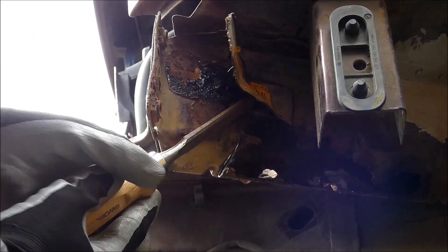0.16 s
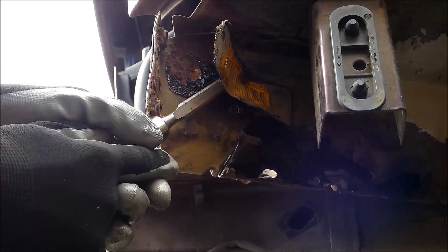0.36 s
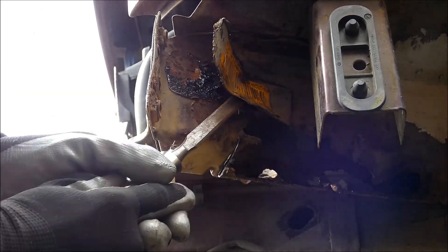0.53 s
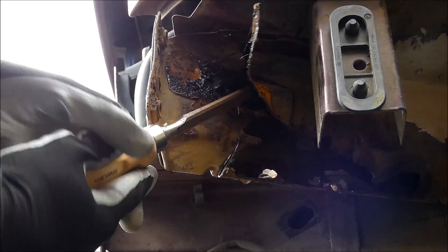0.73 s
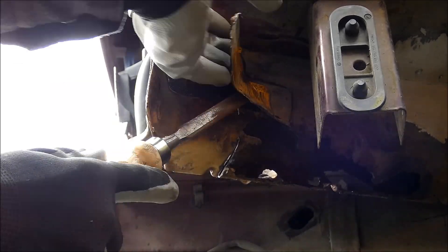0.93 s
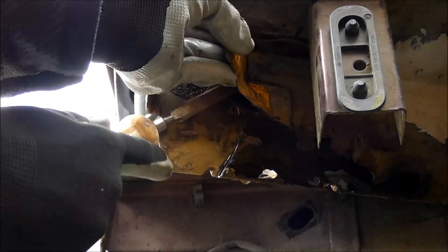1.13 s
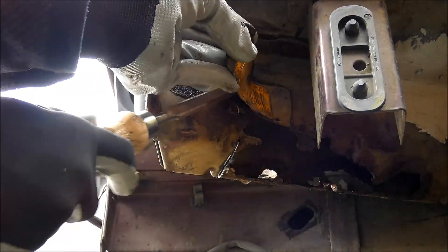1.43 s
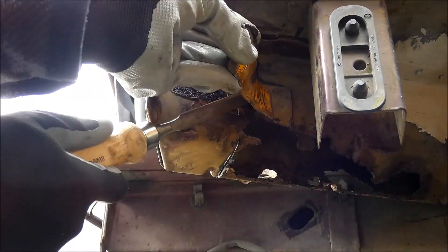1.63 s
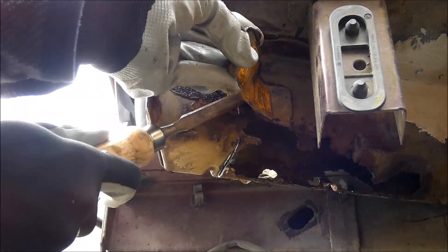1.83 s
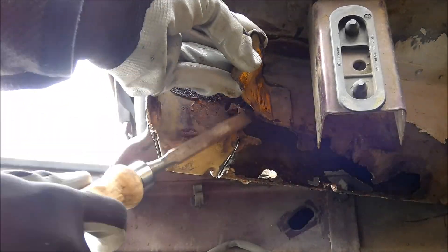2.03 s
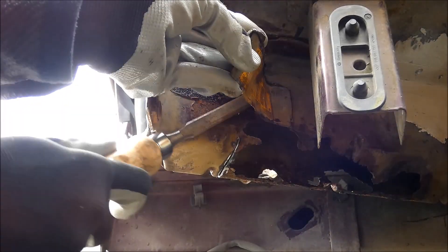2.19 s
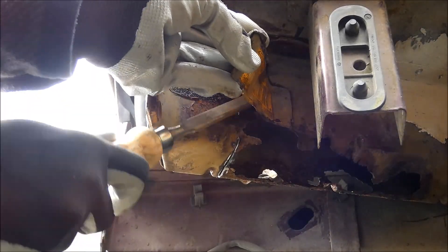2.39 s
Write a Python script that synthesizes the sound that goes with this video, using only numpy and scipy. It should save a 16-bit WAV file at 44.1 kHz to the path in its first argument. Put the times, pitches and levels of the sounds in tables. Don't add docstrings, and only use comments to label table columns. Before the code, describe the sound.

Metal blade prying at rusty car bodywork: bright clinks, gritty crunches and short skids, heard close.

```python
import sys
import numpy as np
from scipy import signal
from scipy.io import wavfile
from scipy.ndimage import uniform_filter1d

SR = 44100
rng = np.random.default_rng(int(sys.argv[2]) if len(sys.argv) > 2 else 0)


def pcm_store(signal):
    levels = np.round(np.clip(np.atleast_2d(signal), -1, 1) * 32767)
    wavfile.write(sys.argv[1], SR, levels.astype(np.int16).T)


def undo_db(level):
    steps = np.asarray(level, float) / 20
    return 10 ** steps


N = 112454

SIDES = np.array([[1], [-1]])
SIDE_SHARE = 0.33
GRIT_PER_S, GRIT_DB = 3000, 3


def unit(x):
    return x / np.sqrt(np.mean(x ** 2))


def band(x, lo_hz, hi_hz):
    return signal.sosfilt(signal.butter(2, [lo_hz, hi_hz], "band", fs=SR, output="sos"), x)


def walk(rate):
    k = int(SR / rate)
    smooth = uniform_filter1d(rng.standard_normal(N), k)
    return unit(uniform_filter1d(smooth, k))


def place(sounds):
    out = np.zeros((2, N + SR))
    for start_s, y in sounds:
        i = int(start_s * SR)
        out[:, i:i + y.shape[1]] += y
    return out[:, :N]


# frequency in Hz, level in dB per Hz.
SHOP_TONE = [(24, -68), (40, -22), (433, 14), (1480, 12.5), (2000, -5), (4800, 1.5), (5180, -41),
             (16000, -29)]
SHOP_DB = -51.5
SHOP_SIDE, BASS_SIDE = 0.35, 0.9
BASS_HZ, BASS_SWAY_DB = 170, 3


def shop():
    out = 0
    tone_hz, tone_db = np.array(SHOP_TONE).T
    sway = BASS_SWAY_DB * walk(4.7)
    for hz in 26 * 2 ** np.arange(0, 9.4, .5):
        mid, side = band(rng.standard_normal((2, N)), hz * .84, hz * 1.19)
        bass = hz < BASS_HZ
        db = np.interp(np.log(hz), np.log(tone_hz), tone_db) + 1.1 * walk(7) + bass * sway
        width = BASS_SIDE if bass else SHOP_SIDE
        out = out + undo_db(db) * (mid + width * side * SIDES)
    return unit(out) * undo_db(SHOP_DB)


# middle in seconds, level in dB.
JOLT_HITS = [(.06, -64), (.35, -64), (.52, -73), (.78, -80), (.93, -75), (1.24, -75), (1.47, -70),
             (1.75, -72), (1.962, -64), (2.128, -65), (2.255, -66), (2.32, -71)]
JOLT_S = 0.0095


def jolts():
    t, out = np.arange(N) / SR, 0
    for s, db in JOLT_HITS:
        u = (t - s) / JOLT_S * 2
        out = out + undo_db(db) * 2 * u * np.exp(-u ** 2)
    return out


# start in seconds, peak in dB, pitch in Hz.
THUD_HITS = [
    (0.438, -43.5, 315),
    (0.823, -56, 300),
    (0.875, -48, 347),
    (.895, -45, 309),
    (0.989, -55, 290),
    (1.612, -51, 353),
    (1.902, -44.5, 356),
    (2.276, -55, 387),
]
THUD_T60_S, THUD_SAG, THUD_RISE_S = 0.089, 0.13, 0.0029


def thuds():
    t, out = np.arange(N) / SR, 0
    for s, db, hz in THUD_HITS:
        u = np.maximum(t - s, 0)
        swell = (1 - np.exp(-u / THUD_RISE_S)) * undo_db(-60 * u / THUD_T60_S)
        sag = 1 - THUD_SAG * np.minimum(u / THUD_T60_S, 1)
        out = out + undo_db(db) * swell * np.sin(2 * np.pi * hz * u * sag)
    return out


ROOM_DB, ROOM_T60_S, ROOM_GAP_S = -20, 0.055, 0.0093
ROOM_LOW_HZ, ROOM_TOP_HZ = 520, 4850


def room(near):
    t = np.arange(int(.3 * SR)) / SR
    tail = band(rng.standard_normal((2, len(t))), ROOM_LOW_HZ, ROOM_TOP_HZ)
    tail = tail * np.exp(-np.log(1000) * t / ROOM_T60_S) * (t > ROOM_GAP_S)
    tail = tail / np.sqrt(np.sum(tail[0] ** 2))
    return undo_db(ROOM_DB) * signal.fftconvolve(near.mean(axis=0)[None], tail)[:, :N]


def grit(chance, per_s, spread_db):
    breaks = chance[0] < per_s / SR
    size = undo_db(-spread_db * np.log(chance[2] + .006))
    return breaks * np.sign(chance[1] - .5) * size


# frequency in Hz, level in dB.
PANEL_MODES = [(945, 3.5), (1240, -11), (1487, 10.5), (1570, 3), (1800, 0), (1990, -4.5), (2220, 8),
               (2370, 7)]
# frequency in Hz, level in dB.
BLADE_MODES = [(2840, 16), (3110, 9), (3380, -22), (3520, 3), (3690, 27), (3890, 0), (4095, 3.5),
               (4200, -12), (4480, -2), (4690, 12), (4770, 19), (4890, -40), (5330, 23)]
# frequency in Hz, level in dB.
FLAKE_MODES = [(5620, -15.5), (6500, -13.5), (6910, 11), (7930, 4.5), (8800, 7.5), (11000, -2)]
# frequency in Hz, level in dB.
HOLLOW_MODES = [(410, -13), (480, 5.5), (530, 9.5), (660, 1.5)]
PANEL, BLADE, FLAKES, HOLLOW = range(4)
# lowest frequency in Hz, highest frequency in Hz.
PART_BANDS_HZ = (933, 2980), (2600, 5030), (4800, 13900), (393, 815)
CRACK_DB, CRACK_T60_S = (-6, 0, -2, -3.5), (0.089, 0.078, 0.088, 0.15)
SNAP_DB = (-3.5, -4.5, -1, -12)
RING_S, RISE_S = .11, .0005
T60_AT_1K_S, T60_SLOPE = .065, .45
GRIP_T60_S, FREE_DB = .008, -17
SCATTER_DB, DETUNE = 2.5, 0.0076
REACH_OCT = .42


def ring(part, centre_hz=None):
    t = np.arange(int(RING_S * SR)) / SR
    lo_hz, hi_hz = PART_BANDS_HZ[part]
    modes = (PANEL_MODES, BLADE_MODES, FLAKE_MODES, HOLLOW_MODES)[part]
    hz, db = np.array(modes).T[:, :, None]

    def fade(t60):
        return np.exp(-np.log(1000) * t / t60)

    strength, shift, side_re, side_im = rng.standard_normal((4, len(hz), 1))
    crack = rng.standard_normal((2, len(t))) * fade(CRACK_T60_S[part])
    if centre_hz:
        db = db - 6 * (np.log2(hz / centre_hz) / REACH_OCT) ** 2
        focus = band(crack, centre_hz * 2 ** -REACH_OCT, centre_hz * 2 ** REACH_OCT)
        crack = focus + 0.59 * crack
    crack = band(crack, lo_hz, hi_hz)

    t60 = T60_AT_1K_S * (hz / 1000) ** -T60_SLOPE
    if part == FLAKES:
        t60 = t60 / 2
    tones = undo_db(db + SCATTER_DB * strength) * fade(t60)
    tones = tones * np.exp(2j * np.pi * hz * (1 + DETUNE * shift) * t)
    mid = tones.imag.sum(axis=0)
    side = (tones * (side_re + 1j * side_im)).imag.sum(axis=0) / np.sqrt(2)

    both = np.array([mid, side]) / np.abs(mid).max()
    both = both + undo_db(CRACK_DB[part]) * crack / np.abs(crack[0]).max()
    if part in (BLADE, FLAKES):
        both = both * (fade(GRIP_T60_S) + undo_db(FREE_DB))
    both = both * (1 - np.exp(-t / RISE_S))
    both[0, int(RISE_S * SR)] += undo_db(SNAP_DB[part]) * SR / 4 / (hi_hz - lo_hz)
    both = band(both, lo_hz * .8, hi_hz * 1.2)
    return both[0] + SIDE_SHARE * both[1] * SIDES


# start in seconds, peak in dB.
KNOCK_HITS = [(.058, -36.5), (.398, -35), (0.514, -31.5), (0.898, -42), (1.113, -32.5), (1.537, -34.5),
              (1.893, -37), (2.1, -41.5), (2.13, -36), (2.17, -49), (2.265, -34), (2.468, -32.5),
              (2.534, -36.5)]
KNOCK_S = .004


def knock(db):
    n = int(KNOCK_S * SR)
    push = np.hanning(n) * rng.standard_normal(n)
    y = signal.fftconvolve(ring(HOLLOW), push[None])
    return undo_db(db) * y / np.abs(y.mean(axis=0)).max()


def knocks():
    return place([(s, knock(db)) for s, db in KNOCK_HITS])


# time in seconds, level in dB.
DRAG_PRESSURE = [(0, -37), (.21, -41.5), (.26, -43.5), (.46, -43.5), (.56, -47.5), (.72, -47.5), (1.0, -50),
                 (1.2, -49), (1.32, -47.5), (1.68, -49), (1.83, -44.5), (2.0, -39.5), (2.07, -60),
                 (2.25, -49), (2.36, -47.5), (2.55, -48.5)]
DRAG_PER_S, DRAG_GRIT_DB = 3500, 3
DRAG_PART_DB = (-6.5, -6, -6, -10.5)
DRAG_FLUTTER_DB, PATCHY_DB = 2.5, 1.5
SPOT_S = .16


def drag():
    s, db = np.array(DRAG_PRESSURE).T
    press = np.interp(np.arange(N) / SR, s, db)
    grains = grit(rng.random((3, N)), DRAG_PER_S, DRAG_GRIT_DB)
    grains = grains * undo_db(press + DRAG_FLUTTER_DB * walk(42))
    out, hop = 0, int(SPOT_S * SR)
    for part in (PANEL, BLADE, FLAKES, HOLLOW):
        push = np.pad(grains * undo_db(PATCHY_DB * walk(28.5)), (hop, 2 * hop))
        y = np.zeros((2, N + SR))
        for i in range(0, N + hop, hop):
            body = ring(part)
            body = body / np.sqrt(np.sum(body ** 2))
            stroke = push[i:i + 2 * hop] * np.hanning(2 * hop)
            z = signal.fftconvolve(body, stroke[None])
            y[:, i:i + z.shape[1]] += z
        out = out + undo_db(DRAG_PART_DB[part]) * y[:, hop:hop + N]
    return out * np.sqrt(np.mean(undo_db(2 * press)) / np.mean(grains ** 2))


# start in seconds, level in dB, length in seconds.
SING_NOTES = [(0.034, -42, 0.039), (0.337, -34, 0.027), (0.633, -43.5, 0.012), (0.694, -52, 0.048),
              (0.774, -53, 0.018), (0.897, -49, 0.019), (.975, -53, 0.022), (1.8, -54, 0.01),
              (1.86, -57, 0.014), (2.039, -34, 0.009), (2.121, -28, 0.026), (2.157, -35, 0.0184),
              (2.214, -44.5, 0.04), (2.264, -43, 0.0091), (2.307, -23.5, 0.0046), (2.384, -46.5, 0.019),
              (2.416, -33.5, 0.005)]
SING_HZ, SING_WIDTH_HZ, SING_EDGE_S = 4730, 210, 0.001


def sing():
    t, gate = np.arange(N) / SR, 0
    for s, db, length_s in SING_NOTES:
        inside_s = np.minimum(t - s, s + length_s - t)
        gate = gate + undo_db(db) * np.clip(inside_s / SING_EDGE_S + 1, 0, 1)

    def note():
        grains = unit(grit(rng.random((3, N)), GRIT_PER_S, GRIT_DB)) * gate
        return band(grains, SING_HZ - SING_WIDTH_HZ / 2, SING_HZ + SING_WIDTH_HZ / 2)

    mid, side = note(), note()
    return (mid + SIDE_SHARE * side * SIDES) * np.sqrt(SR / 2 / SING_WIDTH_HZ)


LEAD_S = .03
PART_DB = 1, -3, 6


def blow(db, panel_db, flakes_db, length_s, centre_hz, lead_s=0.):
    t = (np.arange(int(2 * LEAD_S * SR)) / SR - lead_s) / length_s
    push = grit(rng.random((3, len(t))), GRIT_PER_S, GRIT_DB) * np.exp(-t ** 2) * .5
    push[int(lead_s * SR)] = .5 if lead_s else 1
    out = 0
    for part, rel_db in enumerate((panel_db, 0, flakes_db)):
        y = signal.fftconvolve(ring(part, centre_hz if part == BLADE else None), push[None])
        out = out + undo_db(db + rel_db + PART_DB[part]) * y / np.abs(y.mean(axis=0)).max()
    return out


# middle in seconds, peak in dB, panel in dB, flakes in dB,
# half length in seconds.
SKID_HITS = [(0.344, -13.5, -15, -8.5, 0.0049), (0.642, -29, -15, -9, 0.0017),
             (0.684, -31.5, -11, -25, 0.004), (0.711, -30.5, -9.5, -10.5, 0.011),
             (0.737, -34, -4.5, -8.5, 0.01), (0.508, -36.5, -20, -10, 0.0049),
             (0.78, -36, -8.5, -11, 0.013), (0.83, -38, -11, -10, 0.017), (0.857, -42, -33, 2.5, 0.0032),
             (1.003, -37.5, -14, -8, 0.01), (1.956, -18.5, -10.5, -17, 0.0022), (2.11, -36, -21, -7, .003),
             (2.168, -23, -10.5, -13, 0.0027), (0.9, -29.5, -25, -11, 0.005), (0.939, -39, -36, -4, 0.0081),
             (1.32, -35, -10, -14, 0.037), (1.645, -41, -20, -6, .01), (1.696, -30.5, -12, -11.5, 0.034),
             (1.773, -14, -15.5, -13, 0.0033), (2.023, -25.5, -6.5, -13, 0.0013),
             (2.042, -14.5, -10.5, -10.5, 0.0029), (2.054, -27, -23, -14, 0.0015),
             (2.087, -27.5, -13, -10, 0.0072), (2.141, -13.5, -15, -8.5, 0.0056),
             (2.166, -14, -22, -14.5, 0.0041), (2.245, -32, -25, -12, 0.055), (2.273, -25, -9, -7, 0.02),
             (2.392, -30, -4.5, -9, 0.0026), (2.49, -30.5, -15, -11, 0.011)]
SKID_HZ = 4600


def skids():
    return place([(s - LEAD_S, blow(db, panel_db, flakes_db, half_s, SKID_HZ, LEAD_S))
                  for s, db, panel_db, flakes_db, half_s in SKID_HITS])


# start in seconds, peak in dB, panel in dB, flakes in dB,
# contact pitch in Hz.
CRUNCH_HITS = [(0.0364, -10.5, -22, -16.5, 3930), (0.0494, -19.5, -12, -10.5, 3500),
               (0.0581, -17, -20, -13.5, 4380), (0.089, -22, -15, -10, 4800),
               (0.2857, -24.5, -16.5, -6.5, 4860), (.359, -9.5, -24, -13, 3450),
               (.513, -7.5, -19, -13.5, 3900), (1.1102, -18, -8.5, -14, 4140),
               (1.728, -9.5, -15.5, -11, 4250), (1.9587, -11, -17.5, -16, 3850),
               (1.9695, -14.5, -13, -9, 3650), (1.9768, -12, -17.5, -29.5, 3940),
               (1.981, -4, -46, -17, 4060), (1.9889, -5.5, -15, -19, 3850), (1.993, -17, -30, -10.5, 4700),
               (1.9953, -14.5, -27, -27, 4000), (2.098, -10.5, -18.5, -19.5, 4330),
               (2.1185, -10.5, -9.5, -9, 4550), (2.1284, -9, -19, -11.5, 4800),
               (2.263, -18, -14.5, -14, 3700), (2.522, -33, -6, -26, 4000)]
CRUNCH_S = .0033


def crunches():
    return place([(s, blow(db, panel_db, flakes_db, CRUNCH_S, hz))
                  for s, db, panel_db, flakes_db, hz in CRUNCH_HITS])


# start in seconds, peak in dB, panel in dB, flakes in dB,
# contact pitch in Hz.
TICK_HITS = [(0.02, -21, -5.5, -2.5, 4170), (0.245, -29, -25, -5, 3900), (0.274, -32, -15, -18, 3270),
             (.301, -38, -7, -17, 3200), (0.399, -33, -13, -5.5, 4500), (0.4261, -16, -7.5, -11, 3880),
             (.5882, -36.5, -9, -6, 4900), (0.673, -38, -11, -2, 4500), (0.6895, -37, -20, -6, 4640),
             (.8237, -42.5, -15, -0.5, 4160), (1.9393, -36, -3, -16, 4720), (0.6668, -38, -1, -20, 3130),
             (0.6994, -34, -27, -5, 4740), (0.9731, -37.5, -29, 5.5, 4930), (1.0451, -29, -6, -9, 4740),
             (1.061, -23, -16.5, -16, 3500), (1.0999, -16.5, -13.5, -11, 4300),
             (1.2408, -10.5, -10.5, -16, 3600), (1.369, -26, -14, -9.5, 4500),
             (1.4661, -16.5, -11, -19, 3530), (1.5137, -25.5, -16, -20, 4300),
             (1.5265, -24.5, -2, -4.5, 4770), (1.535, -10, -13, -20, 4000), (1.7064, -21, -7.5, -9, 4900),
             (1.8914, -2, -21.5, -9, 3830), (2.203, -24.5, -15, -4.5, 3800), (2.215, -23.5, -23, -23, 4850),
             (2.3081, -11.5, -18, -2, 5500), (2.4179, -19, -11, -19, 4800), (2.4671, -14.5, -14, -19, 3500),
             (2.5327, -21, -8.5, -23, 4400)]
TICK_S = .0008


def ticks():
    return place([(s, blow(db, panel_db, flakes_db, TICK_S, hz))
                  for s, db, panel_db, flakes_db, hz in TICK_HITS])


PAN_DB, BODY_CUT_HZ = -1, 297


def scene():
    metal = ticks() + crunches() + skids() + knocks() + drag() + sing()
    near = signal.sosfilt(signal.butter(4, BODY_CUT_HZ, "high", fs=SR, output="sos"), metal)
    return near * undo_db(PAN_DB / 2 * SIDES) + room(near) + shop() + thuds() + jolts()


def top_cut(x):
    return signal.sosfilt(signal.butter(12, 16820, fs=SR, output="sos"), x)


def record(dry):
    top_hz = 15900
    mix = signal.sosfilt(signal.ellip(6, .3, 25, top_hz, fs=SR, output="sos"), dry)
    return top_cut(mix)


dry = scene()
out = record(dry)
pcm_store(out)
```